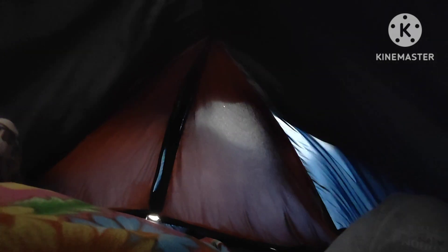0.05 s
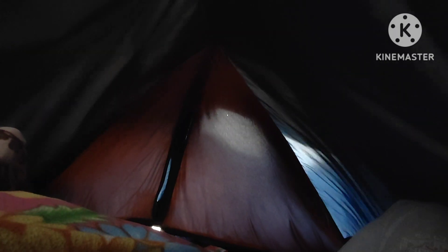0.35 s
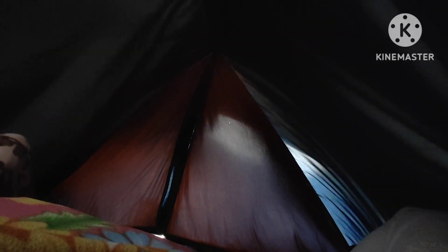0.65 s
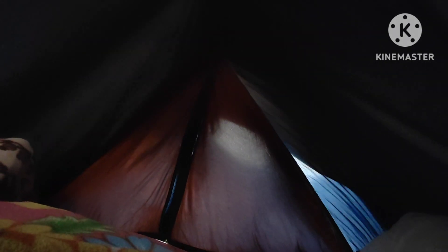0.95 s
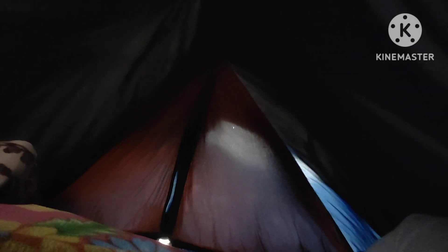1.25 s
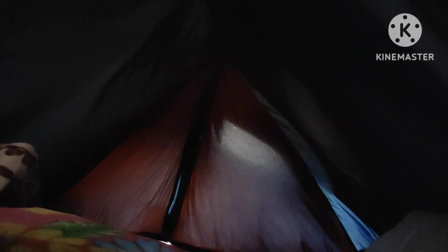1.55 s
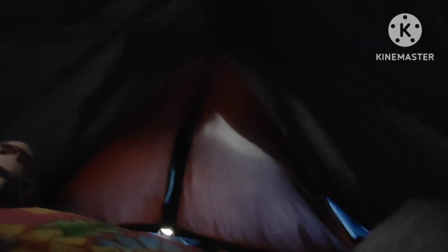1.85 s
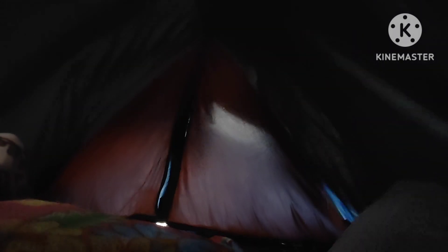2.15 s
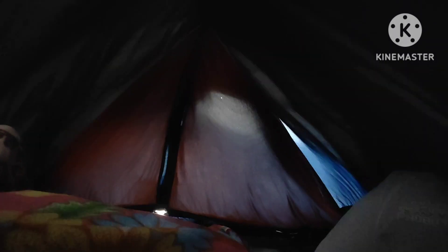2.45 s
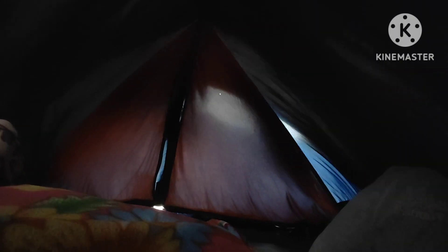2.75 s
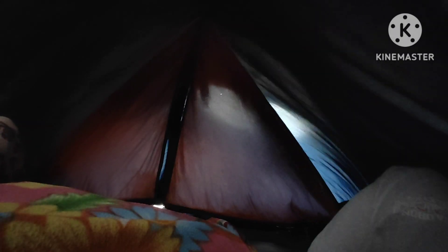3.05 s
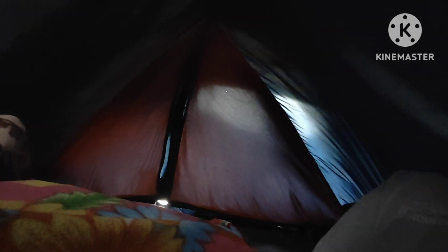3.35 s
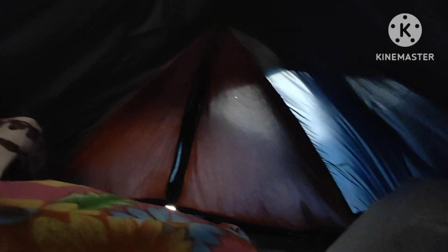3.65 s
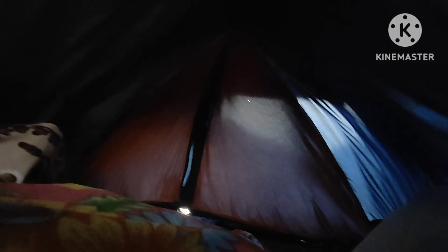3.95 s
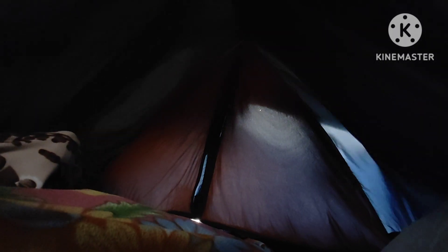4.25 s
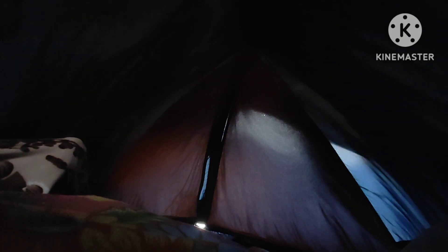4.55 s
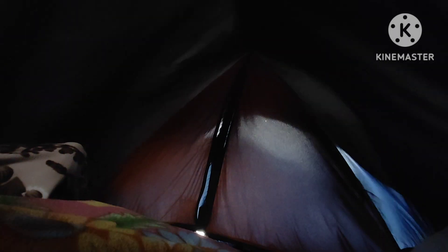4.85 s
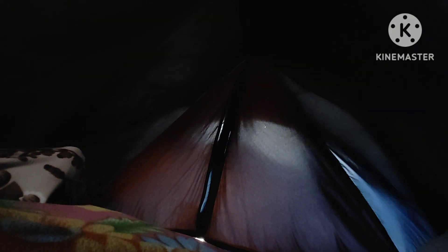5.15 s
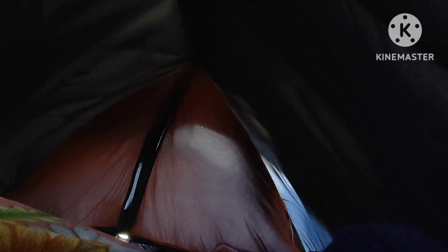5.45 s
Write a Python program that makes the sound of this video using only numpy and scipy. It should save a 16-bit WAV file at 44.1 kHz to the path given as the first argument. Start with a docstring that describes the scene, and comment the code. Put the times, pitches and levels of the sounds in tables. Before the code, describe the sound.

Gusts work the walls of a nylon tent, heard close up from inside. A low rumble and soft hiss run beneath fluttering, rustling cloth and crackling creases. Three tiny clicks come from the left about two seconds in, followed by a cluster of hard flaps. Near four seconds a wall snaps taut amid a long rasping slide of fabric. A few more flaps follow before everything fades out.

```python
"""Inside a nylon tent in gusty wind, heard at two microphone ports.
From the start the wind works the walls: rumble, flutter, rustle, hiss. Walls billow and flap,
cloth slides over cloth, creases buckle. At 2.1-2.3 s something clicks three times by the left port.
The hardest flaps follow at 2.5-3.2 s. At 4.1 s the right wall snaps taut amid a long slide of cloth.
All fades out by 5.23 s."""
import sys
import numpy as np
from scipy import signal
from scipy.fft import rfft, irfft, next_fast_len
from scipy.io import wavfile
from scipy.ndimage import uniform_filter1d

SR = 44100
rng = np.random.default_rng(int(sys.argv[2]) if len(sys.argv) > 2 else 0)


def output_pcm(signal):
    """Save a mono or channel-first signal as 16-bit PCM at the path in sys.argv[1].

    Samples are clipped to [-1, 1] before scaling.
    """
    pcm = np.clip(np.atleast_2d(signal).T, -1, 1) * 32767
    wavfile.write(sys.argv[1], SR, np.round(pcm).astype(np.int16))


N = 250929
TIME_S = np.arange(N) / SR

# Wind on the tent. Each row: time in seconds, force in dB.
WIND_FORCE = [(0.0, -45.5), (0.4, -47), (0.54, -48.5), (0.95, -45.5), (1.11, -42.5), (1.25, -40),
              (1.41, -43.5), (1.56, -44.5), (2.0, -41), (2.48, -38.5), (2.9, -38.5), (3.09, -39),
              (3.27, -43), (3.82, -45), (4.09, -38.5), (4.9, -41.5), (5.0, -42)]
# A wall fills, then goes slack. Each row: fullest moment in seconds, fill time in seconds,
# extra sway in dB, extra rustle in dB.
BILLOWS = [(0.724, 0.048, 8.5, 5), (1.26, 0.021, 1.5, -5), (1.325, 0.052, 6.5, 5.5),
           (2.049, 0.0092, 8, 5.5), (2.18, 0.026, 6.5, 1), (2.555, 0.05, 3.5, 2), (2.605, 0.025, 6, -3),
           (2.785, 0.032, 7, 3), (3.21, 0.075, 9, 4.5), (4.63, 0.055, 3.5, 7), (5.01, 0.079, 7, 6)]
# Cloth slides over cloth. Each row: fastest moment in seconds, rise in seconds, fall in seconds,
# rasp in dB, rustle in dB.
SLIDES = [(0.13, 0.12, 0.074, -48, -49), (0.315, 0.15, 0.088, -44.5, -47.5),
          (0.43, 0.045, 0.044, -50.5, -48.5), (0.7, .022, 0.015, -68, -45.5),
          (1.08, 0.07, 0.096, -52.5, -60), (1.3, 0.061, 0.085, -55, -50), (1.72, 0.19, 0.1, -52.5, -70),
          (2.27, 0.093, 0.083, -53, -50.5), (2.345, 0.015, .016, -64, -43), (2.48, 0.011, .016, -72, -45),
          (2.76, 0.045, 0.054, -57, -43.5), (3.03, 0.1, 0.24, -53, -47), (3.41, 0.15, 0.04, -54.5, -57),
          (3.655, 0.094, 0.049, -51.5, -42.5), (4.058, .008, 0.013, -36, -42),
          (4.31, 0.36, 0.16, -38.5, -51), (4.47, 0.067, 0.13, -45, -62), (4.77, 0.086, 0.15, -54, -46.5),
          (5.005, 0.036, 0.089, -46, -55), (5.14, 0.022, 0.051, -51.5, -50)]
# Clicks by the left port. Each row: time in seconds, relative pressure.
CLICKS = [(2.0845, -0.2), (2.1457, -0.28), (2.3234, -0.28)]
# Creases buckle. Each row: start in seconds, level in dB, tick pitch in Hz, left minus right in dB,
# crumple length in ms.
CRACKLES = [(0.356, -22.5, 1750, -7, 7.7), (0.412, -27.5, 2850, -8, 6.6), (0.5545, -37, 2600, -7, 11),
            (0.666, -31, 1780, -9, 6.3), (0.687, -41, 2390, -6, 12), (0.6998, -30.5, 2070, -11, 6),
            (0.722, -40, 1800, -4, 14), (0.888, -36.5, 1590, 1, 10), (1.594, -28.5, 2720, -3, 8),
            (1.5978, -27, 3530, -5, 6), (1.653, -33, 2270, -11, 6.5), (1.857, -32.5, 3000, -5, 5.4),
            (2.245, -35, 1400, 0, 20), (2.341, -29, 1890, 1, 16), (2.47, -34, 2780, -7, 16),
            (2.514, -32, 1690, -3, 12), (2.542, -34, 1500, -9, 10), (2.557, -27.5, 1700, 1, 5.7),
            (2.591, -31, 1400, -3, 12), (2.65, -31, 1500, -3, 11), (2.7155, -33, 1600, -3, 9),
            (2.731, -32, 1600, -4, 7.5), (2.744, -27, 1500, -4, 18), (2.786, -29, 1840, -3, 10),
            (2.7951, -27, 1600, -7, 8), (3.1891, -28, 2880, -14, 5), (3.2107, -27, 2000, -10, 2.4),
            (3.2175, -29, 2300, -8, 7.7), (4.035, -27, 1500, 2, 27), (4.591, -26, 1650, -3, 7),
            (4.632, -23.5, 2480, -3, 3.4), (4.656, -31, 2500, -3, 5), (4.68, -34, 1210, -2, 5)]
# Walls flap. Each row: time in seconds, relative pressure (+ inward), push length in ms,
# share that rebounds, shudder level in dB, shudder pitch in Hz.
FLAPS = [(0.211, -0.042, .6, .6, -39.5, 520), (0.249, -0.018, 1, 0.63, -41, 420),
         (0.564, 0.046, 0.74, 0.45, -42, 750), (0.7168, -.06, 3.4, .4, -48, 250),
         (0.722, -0.027, 0.6, .6, -35.5, 950), (0.903, -.04, .7, 0.69, -41, 750),
         (1.236, -.087, 3.9, 0.32, -45, 220), (1.2567, 0.0089, 2.8, .5, -39, 300),
         (1.318, 0.054, 3, 0.55, -41, 200), (1.3226, -.18, 1.3, 0.2, -34, 650),
         (1.534, 0.018, .7, 0.53, -38.5, 700), (1.631, -0.0012, 0.61, .6, -38.5, 482),
         (1.7723, 0.055, 5.4, .2, -40, 400), (1.837, -0.01, 1.1, 0.46, -37, 420),
         (1.976, 0.017, 0.98, .6, -38, 520), (2.033, 0.017, 2.3, .5, -41, 600),
         (2.045, 0.0064, 0.79, .6, -34, 850), (2.166, 0.084, 1.4, 0.45, -33, 418),
         (2.207, -.04, .8, .5, -40, 600), (2.542, .14, .7, .7, -30, 850),
         (2.5573, -0.17, 0.81, .65, -29, 600), (2.592, 0.11, 0.55, .3, -35.5, 650),
         (2.606, -0.089, 1.7, .3, -35.5, 500), (2.716, -0.018, 0.54, .7, -36.5, 600),
         (2.746, .12, 3.3, .35, -40, 900), (2.7596, -0.052, 1, 0.38, -37, 500.4),
         (2.7807, -.21, 4, 0.34, -41, 300), (2.8001, 0.23, .6, .85, -32, 1040),
         (2.966, 0.037, 1, 0.48, -40, 700), (3.05, 0.05, .55, .6, -35.5, 750),
         (3.12, 0.047, 1.5, .6, -36.5, 550), (3.14, 0.098, .56, .5, -39, 800),
         (3.1804, .12, 0.9, .1, -38, 600), (3.21, 0.48, 1.1, .18, -27.5, 1050),
         (3.785, .064, 3, .3, -48.5, 400), (3.911, -.045, 0.75, .8, -41.5, 550),
         (3.988, 0.055, 1.2, .6, -40.5, 503), (4.1, 0.031, 1.5, .5, -38, 520),
         (4.216, 0.063, 1.1, .6, -32.5, 580), (4.263, -0.0091, 0.55, .5, -38, 840),
         (4.559, -0.016, 0.91, 0.496, -40.5, 520), (4.594, -0.058, 1.5, .3, -34, 900),
         (4.633, -.13, 1.4, .1, -38, 500), (4.681, -0.058, 0.42, .5, -38, 500),
         (4.893, 0.035, 2, 0.56, -35.5, 570), (4.968, 0.071, 4, 0.17, -39, 400),
         (5.007, -.14, 4.7, .2, -38, 400)]
# Modes of a taut wall. Each row: frequency in Hz, level in dB, T60 in seconds.
WALL_MODES = [(99.9, -1, 0.028), (197, -6, 0.048), (421, 0, 0.033), (895, 0, 0.035), (1069, -0.5, 0.031),
              (1280, -10.5, .022)]
# Spectra of the cloth sounds. Each row: frequency in Hz, relative level in dB.
RUMBLE_SPECTRUM = [(12, -5.5), (22, -9), (36, 3), (54, -3), (90, -1.5), (125, -2), (160, -1.5), (205, -3),
                   (270, -14), (400, -40), (700, -59)]
FLUTTER_SPECTRUM = [(120, -27.5), (220, -6), (300, -5), (400, -0.5), (500, 0), (610, -4), (750, -4),
                    (880, -3), (1100, -3.5), (1350, -16), (2200, -21.5), (5000, -54.5), (15000, -73.5)]
RUSTLE_SPECTRUM = [(600, -21), (1300, 2.5), (1600, 3.5), (2000, 0), (2700, 1.5), (3400, -3), (4200, -7),
                   (5500, -25), (9000, -28), (15000, -36.5)]
HISS_SPECTRUM = [(900, -12), (1900, 1), (2550, 3.5), (3100, 7.5), (3500, 4), (4200, 4.5), (5800, -3),
                 (6800, 0), (7700, -8.5), (9000, -6), (11000, -8), (13500, -15.5), (15300, -8.5)]
RASP_SPECTRUM = [(900, -17), (1900, -4), (2550, 7), (3100, 8.5), (3500, 7), (4200, 6), (5800, -2),
                 (6800, 1), (7700, -7.5), (9000, -5), (11000, -7), (13500, -13), (15300, -5)]
CRACK_SPECTRUM = [(300, -23), (700, -11.5), (1300, 3), (1700, -2), (2500, -2), (4300, -4.5), (5500, -16.5),
                  (7000, -14.5), (8000, -24), (15000, -31)]
# The ports hear the tent differently. Each row: frequency in Hz, left minus right in dB.
PORT_BALANCE = [(200, -0.5), (290, 1.5), (380, -8.5), (450, -6.5), (560, 9.5), (700, 6.5), (850, -0.5),
                (1080, -3.5), (1400, 1.5), (2000, -3), (6000, -5), (7500, 0), (11000, 3), (15000, -2.5)]

PORT_LAG_S = 0.00049  # travel time from port to port
LEFT_RIGHT = np.array([[.5], [-.5]])  # splits a difference between the ports
FADE_S, SILENT_S = 5.14, 5.23


def undb(db):
    """Decibels to gain."""
    return 10 ** (np.asarray(db) / 20)


def unit(x):
    """Scale to rms 1."""
    return x / np.sqrt(np.mean(x ** 2))


def onset_unit(x):
    """Scale to rms 1 over the first 10 ms."""
    return x / np.sqrt(np.mean(x[:, :SR // 100] ** 2))


def spectrum_db(points, size):
    """Interpolate (Hz, dB) rows onto FFT bins, in log frequency."""
    hz, db = np.transpose(points)
    return np.interp(np.log(np.fft.rfftfreq(size, 1 / SR) + 1), np.log(hz), db)


def colour(x, points, size=16384):
    """Minimum-phase filter with the given spectrum."""
    cepstrum = irfft(np.log(undb(spectrum_db(points, size))))
    cepstrum[1:size // 2] *= 2
    cepstrum[size // 2 + 1:] = 0
    impulse = irfft(np.exp(rfft(cepstrum)))[None, :size // 2]
    return signal.fftconvolve(x, impulse, axes=1)[:, :x.shape[1]]


def add(out, at_s, sound):
    """Mix in a two-channel sound."""
    i = max(int(at_s * SR), 0)
    out[:, i:i + sound.shape[1]] += sound[:, :N - i]


def wander(rate_hz):
    """Smoothed random steps, rms 1."""
    hold = max(int(SR / rate_hz), 2)
    steps = rng.standard_normal(N)[np.arange(N) // hold]
    return unit(uniform_filter1d(uniform_filter1d(steps, hold), hold))


def swell(peak_s, rise_s, fall_s):
    """Smooth hump of height 1."""
    return np.exp(-((TIME_S - peak_s) / np.where(TIME_S < peak_s, rise_s, fall_s)) ** 2)


def by_chance(per_s, count=80):
    """Random times in seconds, each with two draws from -1 to 1."""
    gap, a, b = rng.random((count, 3)).T
    at_s = np.cumsum(-np.log(1 - gap)) / per_s
    return np.transpose([at_s, 2 * a - 1, 2 * b - 1])[at_s < SILENT_S]


def diffuse(size):
    """Noise from all around: alike at both ports in the bass, unrelated in the treble."""
    mid, side = rfft(rng.standard_normal((2, size)))
    coherence = .98 * np.sinc(2 * PORT_LAG_S * np.fft.rfftfreq(size, 1 / SR))
    mid *= np.sqrt((1 + coherence) / 2)
    side *= np.sqrt((1 - coherence) / 2)
    return irfft([mid + side, mid - side], size)


def burst(t60_s, size=6000):
    """Diffuse noise that starts at once and dies away."""
    return diffuse(size) * undb(-60 * np.arange(size) / SR / t60_s)


def grains(per_s, spread_db, count=40000):
    """Tiny uneven pushes at random times, each from its own direction."""
    gap, size, sign, bearing = rng.random((count, 4)).T
    at_s = np.cumsum(-np.log(1 - gap)) / per_s
    pressure = undb(spread_db * np.minimum(-np.log(1 - size), 4)) * np.sign(sign - .5)
    lag_s = PORT_LAG_S * (bearing - .5)
    arrivals = [np.abs((at_s + way * lag_s) * SR).astype(int) for way in (1, -1)]
    return unit(np.array([np.bincount(samples, pressure, N)[:N] for samples in arrivals]))


def crumple(per_s, spread_db, t60_s, scatter_db):
    """Grains, each trailed by short scatter from the near walls."""
    ticks = grains(per_s, spread_db)
    pole = undb(-120 / t60_s / SR)
    energy = signal.lfilter([1 - pole], [1, -pole], np.mean(ticks ** 2, axis=0))
    return ticks + undb(scatter_db) * np.sqrt(energy) * diffuse(N)


def wind_db(at_s, usual_db=-43):
    """Wind force above the usual."""
    return np.interp(at_s, *np.transpose(WIND_FORCE)) - usual_db


def rumble(sway_db):
    """Swaying walls press on the enclosed air, nearly alike at both ports."""
    air = unit(colour(diffuse(N), RUMBLE_SPECTRUM))
    # even out the noise so that the gust sets each heave
    strength = uniform_filter1d(np.mean(air ** 2, axis=0), int(.07 * SR)) ** 0.35
    return air / strength * undb(sway_db + 0.99 * wander(16))


def flutter(level_db, split_hz=680):
    """Ripples run along loose cloth and end in dull pats, now lower, now higher."""
    pats = crumple(per_s=1000, spread_db=2.3, t60_s=.03, scatter_db=-2)
    pats = unit(colour(pats, FLUTTER_SPECTRUM))
    low = signal.sosfiltfilt(signal.butter(2, split_hz, fs=SR, output="sos"), pats)
    tilt_db = wander(20)
    tilted = low * undb(tilt_db) + (pats - low) * undb(-tilt_db)
    return tilted * undb(level_db + 1.2 * wander(24))


def rustle(level_db):
    """Countless creases fold and unfold."""
    ticks = crumple(per_s=1200, spread_db=3, t60_s=.035, scatter_db=1)
    return unit(colour(ticks, RUSTLE_SPECTRUM)) * undb(level_db + 1.2 * wander(28))


def hiss(level_db):
    """Air sweeps over the nylon."""
    return unit(colour(diffuse(N), HISS_SPECTRUM)) * undb(level_db + 1.1 * wander(22))


def rasp():
    """Threads of sliding cloth catch and slip."""
    slips = crumple(per_s=2000, spread_db=2.4, t60_s=.025, scatter_db=1)
    return unit(colour(slips, RASP_SPECTRUM)) * undb(1.1 * wander(30))


def walls(slack_s=.022):
    """Wind and billows drive the steady layers; sliding cloth adds rustle and rasp."""
    force_db = wind_db(TIME_S)
    billow_db, creasing_db = sum(np.outer(extra_db, swell(at_s, fill_s, slack_s))
                                 for at_s, fill_s, *extra_db in BILLOWS)
    slide_power = sum(np.outer(undb(levels_db), swell(at_s, rise_s, fall_s)) ** 2
                      for at_s, rise_s, fall_s, *levels_db in SLIDES)
    rasp_gain, rub_gain = np.sqrt(slide_power)
    crease_gain = undb(-52.5 + 0.51 * force_db + creasing_db)
    return (rumble(-38.5 + force_db + billow_db)
            + flutter(-41 + 0.88 * force_db + 0.4 * billow_db)
            + rustle(20 * np.log10(np.hypot(crease_gain, rub_gain)))
            + hiss(-53.5 + 0.8 * force_db)
            + rasp_gain * rasp())


def clicks(width_ms=0.14, rebound=0.37, right_db=-28):
    """Something tiny strikes by the left port: a pressure spike and its slower rebound."""
    out = np.zeros((2, N))
    t_s = np.arange(-100, 200) / SR
    widths = t_s / (width_ms / 1000)
    spike = np.exp(-np.abs(widths)) - rebound * np.exp(-((widths - 4) / 2) ** 2)
    for at_s, pressure in CLICKS:
        add(out, at_s + t_s[0], pressure * spike * undb([[0], [right_db]]))
    return out


def tick(hz, decay_cycles=1.74):
    """One crease gives way: a cycle or two at its pitch."""
    cycles = hz * np.arange(6000) / SR
    attack = 1 - np.exp(-(cycles / .8) ** 2)
    return 1.15 * np.sin(2 * np.pi * cycles) * np.exp(-cycles / decay_cycles) * attack


def crackles(neighbours=4, spread_octaves=0.57, crinkle_db=-8):
    """A buckling crease ticks, sets off its neighbours and leaves a haze of crinkles."""
    out = np.zeros((2, N))
    small = [(at_s, -41 + 0.51 * wind_db(at_s), 2198 * 2 ** (pitch / 2), 6 * side - 5, 10)
             for at_s, pitch, side in by_chance(per_s=6)]
    for at_s, db, hz, pan_db, length_ms in CRACKLES + small:
        gain = undb(db + pan_db * LEFT_RIGHT)
        crinkle = colour(burst(t60_s=.06), CRACK_SPECTRUM)
        add(out, at_s, gain * (tick(hz) + undb(crinkle_db) * crinkle / np.abs(crinkle).max()))
        for late, pitch in rng.random((neighbours, 2)):
            neighbour = tick(hz * 2 ** (spread_octaves * (2 * pitch - 1)))
            add(out, at_s + late * length_ms / 1000, gain * undb(-4 - 5 * late) * neighbour)
    return out


def push(peak_s, length_ms, rebound, lag_s):
    """Pressure builds as cloth speeds up, collapses as it stops. Returns start in seconds and sound."""
    t_s = np.arange(-600, 600) / SR
    lengths = (t_s - lag_s * LEFT_RIGHT) / (length_ms / 1000)
    cusp = np.exp(-np.abs(lengths / np.where(lengths < 0, .8, .36)) ** 1.7)
    recoil = rebound * np.exp(-(lengths - .72) ** 2 / .13)
    return peak_s + t_s[0], cusp - recoil


def flaps(db_per_octave=-10, crack_db=-22.5):
    """A flap pushes the air; the stopped wall shudders around its own pitch and the cloth cracks."""
    out = np.zeros((2, N))
    small = [(at_s, np.sign(way) * 0.012 * undb(wind_db(at_s)), 1.5 * 2 ** span, .3,
              -46.5 + wind_db(at_s), 598 / 2 ** span)
             for at_s, way, span in by_chance(per_s=7)]
    for at_s, pressure, length_ms, rebound, shudder_db, pitch_hz in FLAPS + small:
        start_s, cusp = push(at_s, length_ms, rebound, lag_s=rng.uniform(-0.91, .6) * PORT_LAG_S)
        add(out, start_s, pressure * cusp)
        peaked = [(hz, db + db_per_octave * abs(np.log2(hz / pitch_hz))) for hz, db in FLUTTER_SPECTRUM]
        shudder = onset_unit(colour(burst(t60_s=.03), peaked))
        crack = onset_unit(colour(burst(t60_s=.03), CRACK_SPECTRUM))
        add(out, at_s, undb(shudder_db) * (shudder + undb(crack_db) * crack))
    return out


def wall_ring(left_lag_s=0.000082, rise_s=0.0012):
    """A pulled wall rings in its modes, rising as the tension crosses the cloth."""
    t_s = np.maximum(np.arange(6000) / SR - np.array([[left_lag_s], [0]]), 0)
    ring = sum(undb(db - 60 * t_s / t60_s) * np.sin(2 * np.pi * hz * t_s) for hz, db, t60_s in WALL_MODES)
    return ring * (1 - np.exp(-t_s / rise_s))


def snap(at_s=4.1222, jerk_ms=0.29, second_crack_s=0.0053):
    """The right wall jerks taut: it rings briefly and the cloth cracks twice."""
    out = np.zeros((2, N))
    start_s, jerk = push(at_s + jerk_ms / 1000, jerk_ms, rebound=0.45, lag_s=0.00025)
    add(out, start_s, 0.35 * jerk)
    add(out, at_s, undb(-10) * wall_ring())
    for delay_s, db in ((0, -13.5), (second_crack_s, -12)):
        add(out, at_s + delay_s, undb(db) * colour(burst(t60_s=.07), CRACK_SPECTRUM))
    return out


def scene():
    """Walls, snap and flaps, coloured by where each port lies, plus crackles and clicks."""
    cloth = walls() + snap() + flaps()
    size = next_fast_len(N)
    port_gain = undb(spectrum_db(PORT_BALANCE, size) * LEFT_RIGHT)
    at_ports = irfft(rfft(cloth, size) * port_gain, size)[:, :N]
    return at_ports + crackles() + clicks()


def record(dry, top_hz=15500):
    """Fade-out and steep low-pass."""
    fade = np.clip((SILENT_S - TIME_S) / (SILENT_S - FADE_S), 0, 1) ** 0.82
    return signal.sosfilt(signal.ellip(12, .2, 90, top_hz, fs=SR, output="sos"), dry * fade)


dry = scene()
out = record(dry)
output_pcm(out)
```